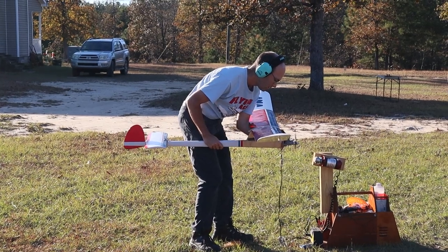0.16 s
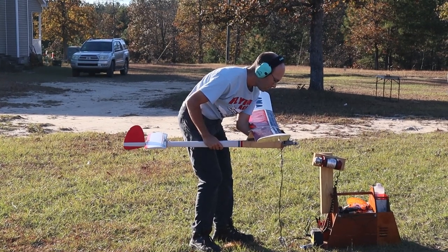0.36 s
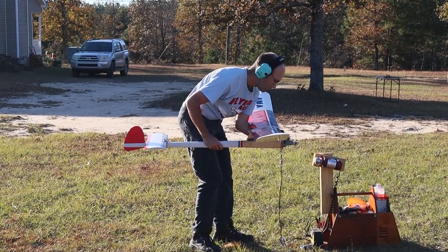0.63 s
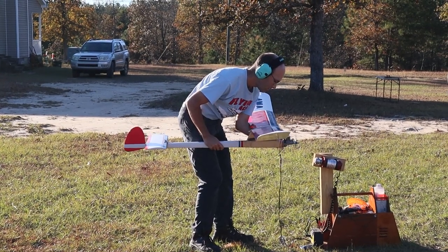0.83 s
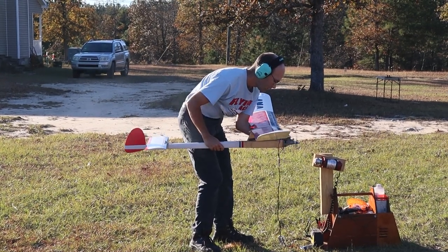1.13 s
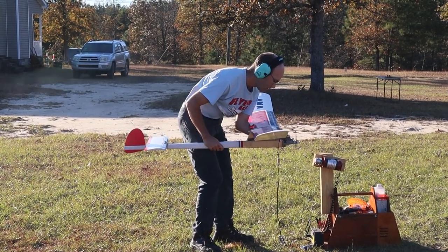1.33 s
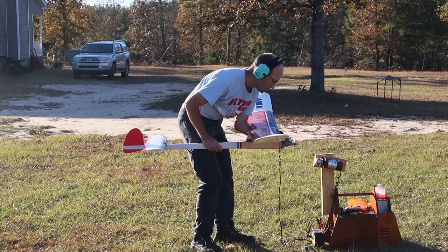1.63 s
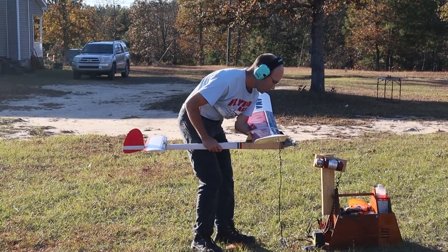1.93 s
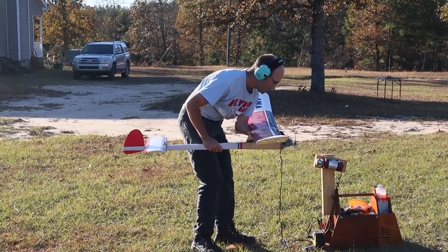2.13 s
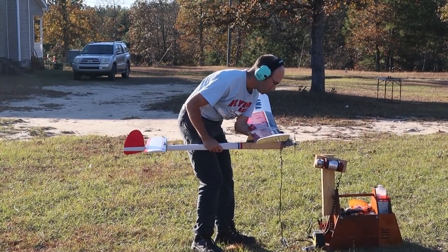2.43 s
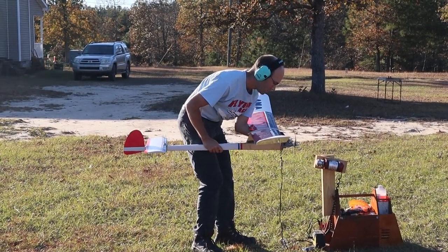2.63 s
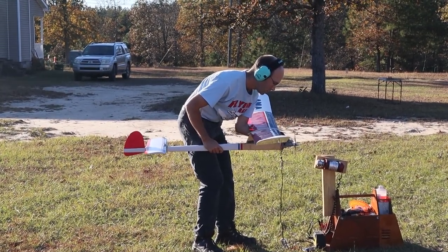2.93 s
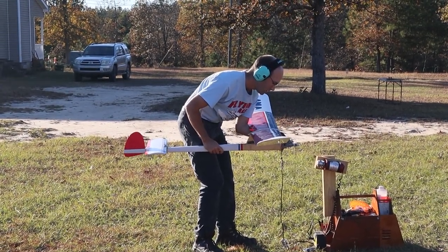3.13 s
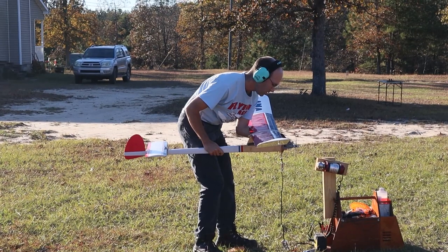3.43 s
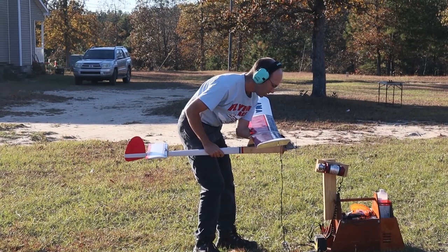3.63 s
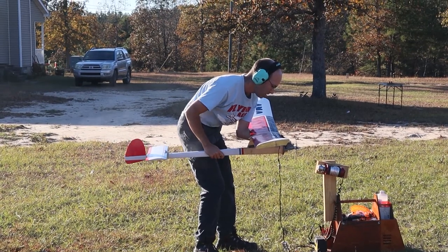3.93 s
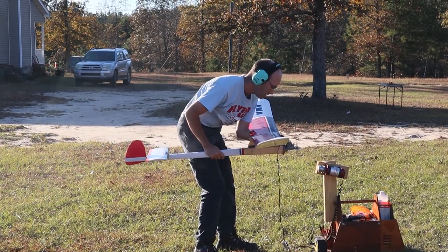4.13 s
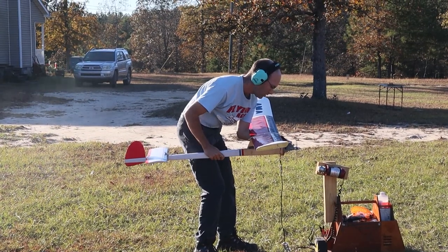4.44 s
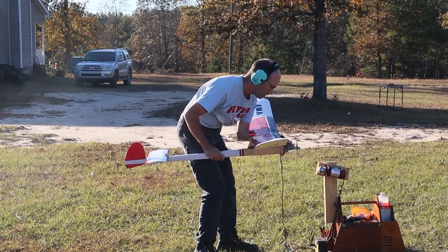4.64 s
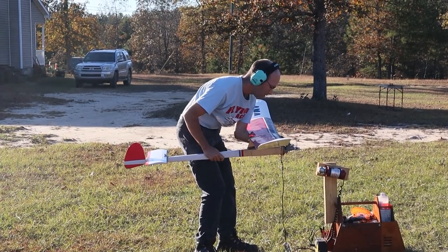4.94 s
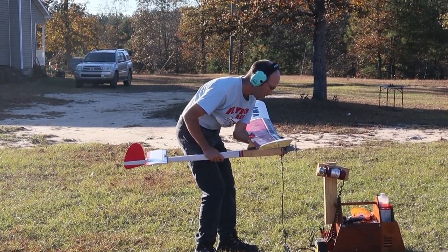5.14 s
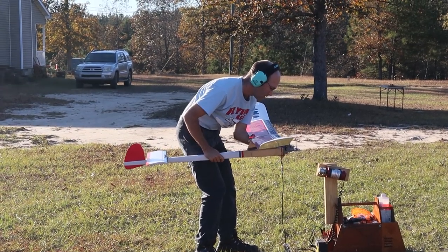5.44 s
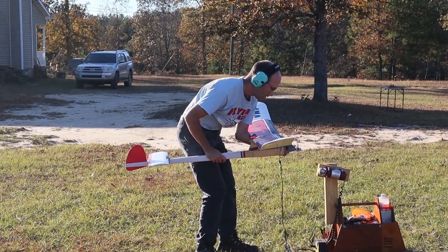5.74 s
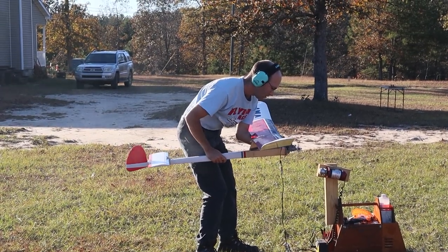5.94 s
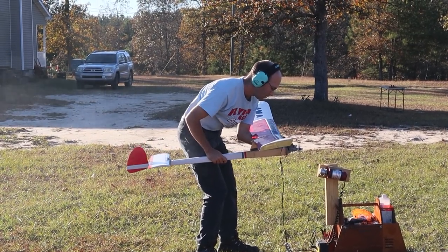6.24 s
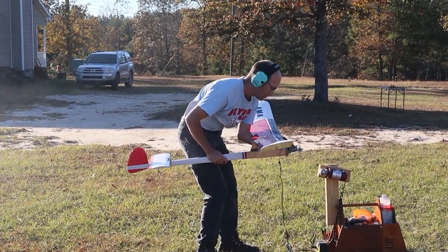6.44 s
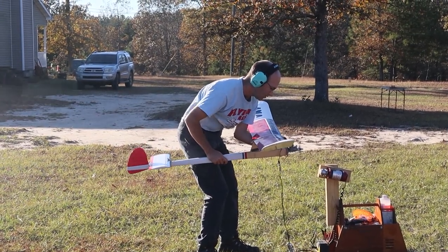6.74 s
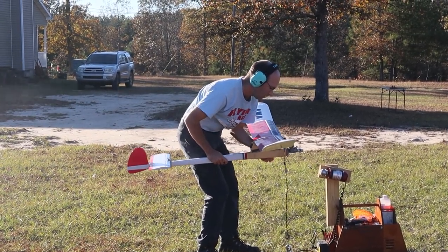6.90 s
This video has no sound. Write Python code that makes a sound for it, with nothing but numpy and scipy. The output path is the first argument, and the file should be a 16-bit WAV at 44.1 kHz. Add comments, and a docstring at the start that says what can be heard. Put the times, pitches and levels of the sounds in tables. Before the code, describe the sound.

A tiny two-stroke glow engine on a hand-held model plane, heard in mono from a few metres on an open lawn. Rough, loud popping idle leaps into a ripping whine, stumbles, winds down to dull uneven putters, then surges again. After a second drop, a third burst holds at high revs to the end, easing slightly. Faint wind and a short yard reflection lie behind.

```python
"""Over an open lawn, a mono microphone stands a few metres from a hand-held model plane.
Its small two-stroke glow engine is revved three times; every turn the exhaust port opens with a pop.
At idle many firings are weak and dull; at speed the pops run together over a hum of shaft multiples.
Each pop is a click filtered by the steepness of its pressure front, then returned by grass and near objects.
Behind it lie intake ticks, scattered returns from the yard and wind noise; the hardest peaks clip."""
import sys
import numpy as np
from scipy import signal
from scipy.io import wavfile

SR = 44100
rng = np.random.default_rng(int(sys.argv[2]) if len(sys.argv) > 2 else 0)


def to_wav(s):
    """Save 16-bit WAV."""
    ch = np.atleast_2d(s).T  # columns
    pcm = np.round(np.clip(ch, -1, 1) * 32767)  # PCM
    wavfile.write(sys.argv[1], SR, pcm.astype(np.int16))


N = 311787

# Shaft speed: t/s, speed/(turns per s)
SHAFT_SPEED = [(0.0, 82.53), (0.154, 96.41), (0.384, 83.02), (0.461, 94.79), (0.615, 103.18),
               (0.692, 122.83), (0.807, 164.98), (0.922, 284.65), (0.999, 345.81), (1.076, 357.93),
               (1.23, 362.4), (1.345, 347.06), (1.383, 312.84), (1.422, 253.96), (1.46, 257.25),
               (1.652, 193.5), (1.768, 137.33), (1.844, 128.13), (1.96, 130.46), (1.998, 119.38),
               (2.152, 110.34), (2.229, 98.78), (2.305, 96.84), (2.382, 83.11), (2.613, 91.43),
               (2.997, 93.4), (3.074, 102.22), (3.151, 90.98), (3.535, 111.15), (3.612, 138.28),
               (3.689, 184.18), (3.804, 307.15), (3.842, 325.93), (4.15, 360.78), (4.227, 362.65),
               (4.38, 341.91), (4.419, 314.67), (4.457, 307.5), (4.496, 262.15), (4.534, 247.35),
               (4.611, 250.34), (4.688, 225.72), (4.918, 181.32), (4.995, 150.47), (5.072, 136.35),
               (5.149, 139.02), (5.226, 129.73), (5.456, 141.01), (5.61, 166.78), (5.687, 218.78),
               (5.725, 271.28), (5.802, 337.7), (5.917, 343.0), (6.148, 364.5), (6.27, 368.6),
               (6.455, 359.0), (6.763, 345.8), (6.993, 316.8), (7.07, 318.2)]
# Level of a good firing as heard, with the recorder's automatic gain turning it down at full revs,
# before each layer's fixed gain: t/s, level/dB
FIRING_AS_HEARD = [(0, -4.5), (.6, -4), (.7, -2), (.82, -7), (.95, -9), (1.0, -11.5), (1.33, -13.5),
                   (1.42, -11), (1.47, -11), (1.52, -13), (1.72, -15.5), (1.95, -12.5), (2.35, -13),
                   (3.0, -9.5), (3.45, -7), (3.62, -5), (3.8, -8.5), (3.85, -11), (4.0, -10.5), (4.2, -13),
                   (4.55, -11.5), (4.7, -13.5), (5.0, -15.5), (5.55, -13), (5.7, -9), (5.82, -10.5),
                   (6.2, -12.5), (7.07, -14)]
# Clearly weak firings, each applied to the nearest one: t/s, loss of steepness/dB
MISFIRES = [(.09, -7), (.122, -7), (.175, -12), (.228, -18), (.272, -29), (.306, -47), (.377, -20),
            (.4, -37), (.434, -11), (.456, -19), (.538, -7), (.598, -4), (1.383, -9), (1.407, -32),
            (1.627, -12), (1.652, -21), (1.701, -10), (1.707, -10), (1.726, -18), (1.796, -21),
            (1.849, -15), (1.872, -12), (1.919, -22), (1.965, -28), (1.989, -21), (2.182, -17),
            (2.201, -28), (2.231, -27), (2.251, -17), (2.272, -17), (2.323, -21), (2.391, -24),
            (2.415, -20), (2.451, -20), (2.474, -23), (2.521, -28), (2.587, -20), (2.641, -24),
            (2.674, -38), (2.707, -25), (2.773, -20), (2.838, -22), (2.871, -21), (2.924, -22),
            (2.977, -19), (3.071, -32), (3.142, -32), (3.207, -29), (3.24, -7), (3.281, -4), (3.31, -35),
            (3.32, -27), (3.389, -32), (3.428, -13), (3.447, -12), (3.502, -9), (3.528, -5), (4.477, -31),
            (4.869, -25), (4.976, -25), (4.995, -18), (5.03, -15), (5.072, -8), (5.101, -8), (5.189, -11),
            (5.287, -6)]
# Spectrum of a pop: f/Hz, weak level/dB, firm level/dB, hard level/dB
POP_SPECTRA = [(101, -34, -79, -43.5), (359, -15, -2.5, 2.5), (900, 2, -4, -17), (1050, -12.5, 3.5, -8.5),
               (1523, -2.5, 3.5, 4.5), (1840, -7.5, -5, -3.5), (2350, -2, 0.5, 2.5), (2800, 3.5, 2, -1.5),
               (3394, -28, -41.5, -1), (3655, -47, -12, -9), (4080, -20, -3, -3.5),
               (5400, -16.5, -14, -2.5), (5900, -15.5, -21.5, 1), (8050, -33, -12.5, 2.5),
               (9140, -33, -28.5, -2.5), (11000, -54, -65, -23.5), (10760, -65, -80, -8),
               (14400, -58, -41, -13.5), (16500, -62, -35, -16.5)]
# Front steepness of a weak, a firm and a hard pop: steepness/dB
FRONT_STEEPNESS = [-16, 1, 7]
# Front steepness growing with the revs: revs/(0-1), steepness/dB
REVS_STEEPNESS = [(0, 3), (.2, 5.5), (.4, 6), (.55, 7), (1, 15.5)]
# Throttle snaps shut, the charge starves, then the engine catches at once: catch t/s, length/s, level/dB
STUMBLES = [(1.413, 0.082, -6), (4.415, .03, -2.5), (4.515, 0.087, -6)]
# Modes of the metal cylinder and exhaust stub: f/Hz, t60/s, level/dB
CYLINDER_MODES = [(2867, 0.01, -25.5), (5265, 0.01, -30.5), (5935, 0.0093, -27.5), (7870, 0.019, -52.5),
                  (11870, 0.011, -57)]
# Spectrum of the exhaust hiss: f/Hz, level/dB
HISS_SPECTRUM = [(300, -22), (750, 0), (1100, -6), (1500, -3), (2600, -6), (3400, -22), (4500, -10),
                 (8000, -11), (10300, -25), (13000, -20), (16000, -30)]
# Extra path by way of the ground, changing as the plane is tilted: t/s, delay/ms
GROUND_DELAY = [(0, 1.25), (.7, 1.296), (1.5, 1.43), (2.2, 1.245), (2.9, 1.29), (3.5, 1.28), (4.2, 1.46),
                (5, 1.335), (5.6, 1.355), (6.3, 1.37), (7.07, 1.52)]
# Returns off the wing, the pilot and the field box: delay/ms, level/dB
NEAR_ECHOES = [(2.402, -10.5), (3.602, -13), (4.9, -22), (6.1, -22)]
# Spectrum of the intake tick: f/Hz, level/dB
TICK_SPECTRUM = [(800, -37), (2000, -7), (3400, 12.5), (4500, 13.5), (6000, 2), (8000, 9), (10000, -35),
                 (16000, -58)]
# Propeller and crankcase hum: multiple of shaft speed, idle level/dB, middle level/dB, full level/dB
HUM_MULTIPLES = [(1, -50.5, -37, -24), (2, -46.5, -40.5, -18), (3, -36.5, -19.5, -21.5),
                 (4, -42, -18.5, -61), (5, -45.5, -30, -24.5), (6, -29.5, -38, -16.5)]
# Spectrum of the outdoor air: f/Hz, level/dB
AIR_SPECTRUM = [(20, -20), (60, -23), (150, 4), (400, -1.5), (2000, 1), (8000, -27), (16000, -38)]

FIRST_TURN = .207  # part of a turn already made at the start
PULL_DB, FULL_PULL = 7, 2140  # extra steepness while speeding up (dB), reached at (turns per s per s)
REBOUND_DB = 0  # the firing after a misfire starts as a good one, with no loss
WEAK_SHARE, WEAK_DB = 0.086, -21.5  # chance of a weak firing at idle, and its loss (dB)
WEAK_BELOW = .35  # revs (0-1) above which these chance weak firings cease
WIND_DB, GUSTS_DB, GUST_S = -47.5, 4, 0.314  # mean gain (dB), spread (dB), time between changes (s)
FIRST_GUST_DB, FIRST_GUST_S = 20, 0.23  # gust dying away at the start: rise (dB), decay time (s)
EDGE_HZ = 15750  # upper band limit


def exhaust(turns):
    """One pop per firing, coloured by how steep its pressure front is, with metal ring and hiss."""
    t, loss_db = firings(turns)
    # a weak burn dulls the pop more than it softens it
    size = -gain_of(firing_level(t) + 0.074 * loss_db + 17.0)
    grade = np.interp(steepness(t) + loss_db, FRONT_STEEPNESS, [0, 4, 7])
    pops = np.zeros(N)
    hz, *fronts = np.transpose(POP_SPECTRA)
    for k in range(8):  # each pop is shared between the two nearest of eight colours
        db = [np.interp(k, [0, 4, 7], row) for row in np.transpose(fronts)]
        share = np.clip(1 - abs(grade - k), 0, 1)
        pops += colour(arrivals(t, size * share), np.transpose([hz, db]))
    hiss = exhaust_hiss(t, abs(size) * gain_of(.3 * loss_db - 11 * revs(t)))
    return pops + cylinder_ring(t, size * (grade / 7) ** 2) + hiss


def firings(turns):
    """Time of each firing and its loss in dB against a good one; slow running burns unevenly."""
    # each pop falls a quarter of a millisecond ahead of the whole turn
    t = np.interp(np.arange(1, int(turns[-1]) + 1), turns, np.arange(N) / SR) - .00025
    idle = (1 - revs(t)) ** 2.5
    chance = rng.standard_normal((len(t), 3))
    loss_db = .6 * chance[:, 0] - 2.5 * idle * abs(chance[:, 2])
    is_weak = rng.random(len(t)) < WEAK_SHARE * (1 - revs(t) / WEAK_BELOW)
    loss_db += WEAK_DB * is_weak
    misfired = [np.argmin(abs(t - when)) for when, db in MISFIRES]
    loss_db[np.add(misfired, 1)] = REBOUND_DB
    loss_db[misfired] = [db for when, db in MISFIRES]
    jitter = 1e-6 * (4 + 70 * idle) * chance[:, 1]
    return t + jitter, loss_db


def firing_level(t):
    """Level in dB of a good firing as heard, turned down by automatic gain, dipping at the stumbles."""
    dips = sum(db * np.clip(1 - (when - t) / length, 0, 1) * (t < when)
               for when, length, db in STUMBLES)
    return curve(FIRING_AS_HEARD, t)[0] + dips


def steepness(t):
    """Steepness of a good firing's pressure front in dB, from revs and acceleration."""
    pull = (curve(SHAFT_SPEED, t + .07)[0] - curve(SHAFT_SPEED, t - .07)[0]) / .14
    return curve(REVS_STEEPNESS, revs(t))[0] + PULL_DB * np.clip(pull / FULL_PULL, 0, 1)


def revs(t):
    """Shaft speed scaled from 0 at idle to 1 at full throttle."""
    return np.clip((curve(SHAFT_SPEED, t)[0] - 90) / 270, 0, 1)


def arrivals(t, size):
    """Each pop heard directly, then later and duller by way of the grass and off nearby things."""
    later = gain_of(-3.0) * clicks(t + curve(GROUND_DELAY, t)[0] / 1000, size)
    later += sum(gain_of(db) * clicks(t + ms / 1000, size) for ms, db in NEAR_ECHOES)
    return clicks(t, size) + signal.lfilter([.5], [1, -.5], later)


def cylinder_ring(t, size):
    """Decaying metal modes struck by the pops; so small a body radiates little bass."""
    age = np.arange(1500) / SR
    modes = sum(gain_of(db - 60 * age / t60) * np.sin(2 * np.pi * hz * age)
                for hz, t60, db in CYLINDER_MODES)
    no_bass = signal.butter(2, 1500, "high", fs=SR)
    struck = signal.oaconvolve(clicks(t, size), modes)[:N]
    return signal.lfilter(*no_bass, struck)


def exhaust_hiss(t, size):
    """A faint puff of coloured noise after each firing, decaying with a 4 ms time constant."""
    puff = signal.lfilter([1], [1, -np.exp(-1 / (.004 * SR))], abs(clicks(t, size)))
    return gain_of(-32) * colour(puff * rng.standard_normal(N), HISS_SPECTRUM)


def intake(turns):
    """The valve in the shaft shuts about half a turn after the pop: a small tick, uneven at idle."""
    t = np.interp(np.arange(int(turns[-1])) + .46, turns, np.arange(N) / SR)
    uneven_db = (.8 + 3.5 * (1 - revs(t))) * rng.standard_normal(len(t))
    size = gain_of(firing_level(t) - 21.5 - 2.1 * revs(t) + uneven_db)
    return colour(clicks(t, size), TICK_SPECTRUM)


def hum(turns):
    """Low multiples of the shaft speed; their balance changes with the revs and they waver at idle."""
    t = np.arange(N) / SR
    knots = np.arange(500) * .015  # times of the random levels (s)
    # alternate turns differ a little: a tone at half the shaft speed
    half_db = -53.0 + 4.4 * np.interp(t, 4 * knots, rng.standard_normal(500))
    tones = gain_of(half_db) * revs(t) * np.cos(np.pi * turns)
    for k, *levels in HUM_MULTIPLES:
        waver_db = 2.75 * (1 - revs(t)) * np.interp(t, knots, rng.standard_normal(500))
        level_db = np.interp(revs(t), (0, .3, 1), levels) + waver_db
        tones += gain_of(level_db) * np.cos(2 * np.pi * k * turns + k * k)
    return gain_of(firing_level(t)) * tones


def yard(engine):
    """Scattered returns from trees and a shed: sparse taps of random sign that die away."""
    at = np.arange(300, 20000, 22) + rng.integers(0, 22, 896)
    taps = np.zeros(20100)
    taps[at] = rng.choice([-1., 1.], len(at)) * gain_of(-60 * at / SR / 0.12)  # t60 0.12 s
    dull = signal.lfilter([.6], [1, -.4], taps)
    return signal.oaconvolve(engine, dull / np.linalg.norm(dull))[:N]


def outdoor_air(t):
    """Light wind on the microphone: coloured noise with random gusts about a mean level."""
    gusts = np.interp(t, np.arange(60) * GUST_S, rng.standard_normal(60))
    level_db = WIND_DB + GUSTS_DB * gusts + FIRST_GUST_DB * np.exp(-t / FIRST_GUST_S)
    return gain_of(level_db) * colour(rng.standard_normal(N), AIR_SPECTRUM)


def gain_of(db):
    """Decibels to an amplitude factor."""
    return 10 ** (np.asarray(db) / 20)


def curve(rows, x):
    """Columns of a table, joined by straight lines, at points x of its first column."""
    points, *columns = np.transpose(rows)
    return [np.interp(x, points, c) for c in columns]


def colour(x, points):
    """Causal (minimum phase) filter with the given spectrum."""
    f, db = np.transpose(points)
    hz = abs(np.fft.fftfreq(4096, 1 / SR))
    log_gain = np.log(gain_of(np.interp(np.log(hz + 1), np.log(f + 1), db)))
    # the Hilbert transform of the log gain gives the minimum phase
    spectrum = np.exp(np.conj(signal.hilbert(log_gain)))
    taps = np.fft.ifft(spectrum).real[:1024]
    return signal.oaconvolve(x, taps)[:N]


def clicks(t, size):
    """Windowed sinc pulses, placed between samples at their exact times."""
    at = np.floor(t * SR).astype(int)[:, None] + np.arange(-12, 13)
    gap = at - t[:, None] * SR
    shape = np.sinc(gap) * np.cos(np.pi * gap / 28) ** 2
    pulses = size[:, None] * shape
    return np.bincount(np.clip(at, 0, N).ravel(), pulses.ravel(), N + 1)[:N]


def scene():
    """Engine, yard and outdoor air, alike in both channels."""
    t = np.arange(N) / SR
    turns = FIRST_TURN + np.cumsum(curve(SHAFT_SPEED, t)[0]) / SR
    engine = exhaust(turns) + intake(turns) + hum(turns)
    mono = engine + gain_of(-16.5) * yard(engine) + outdoor_air(t)
    return np.tile(mono, (2, 1))


def record(dry):
    """Hard clipping just under full scale, then a steep low-pass as the band limit."""
    edge = signal.firwin(511, EDGE_HZ, window=("kaiser", 9), fs=SR)
    clipped = np.clip(dry, -.9, .9)
    return signal.oaconvolve(clipped, edge[None], "same")


dry = scene()
out = record(dry)
to_wav(out)
```